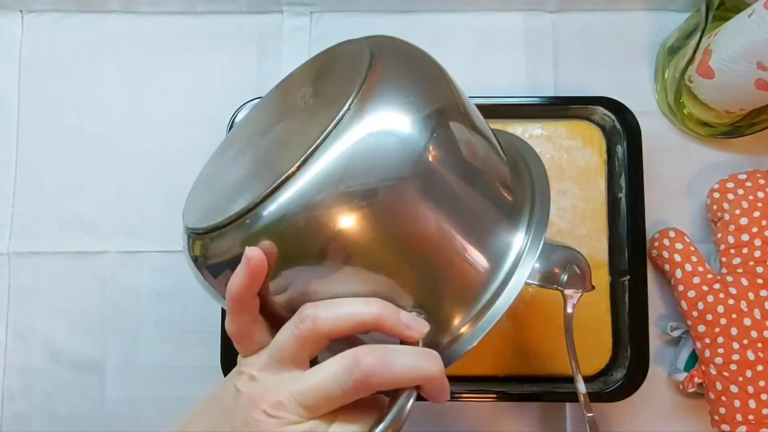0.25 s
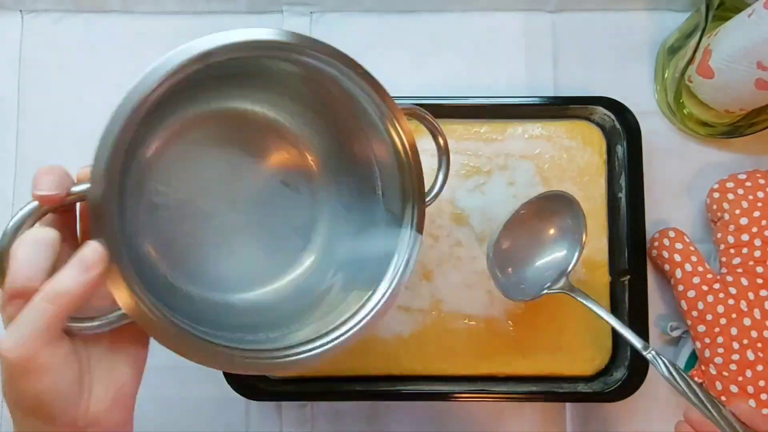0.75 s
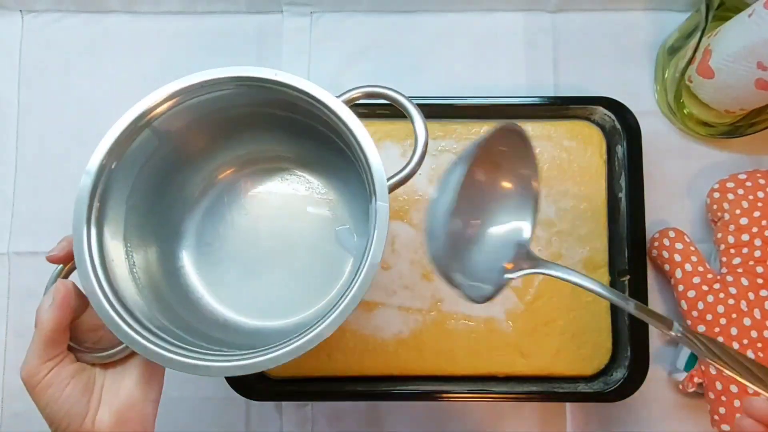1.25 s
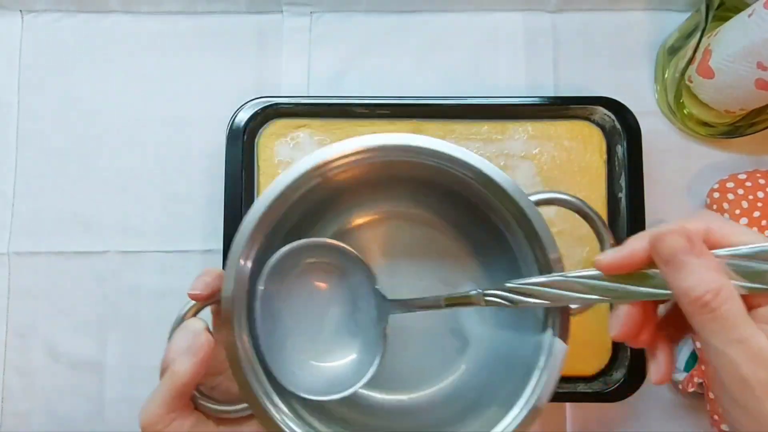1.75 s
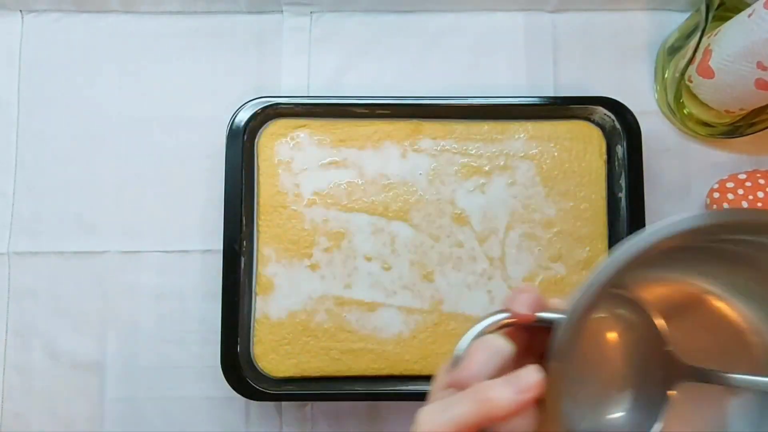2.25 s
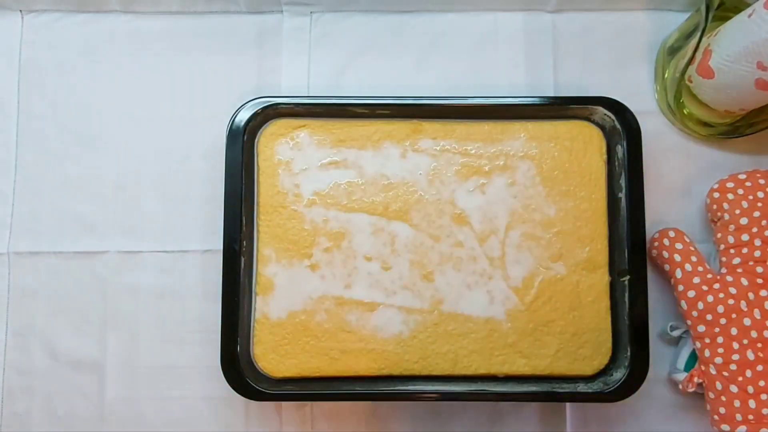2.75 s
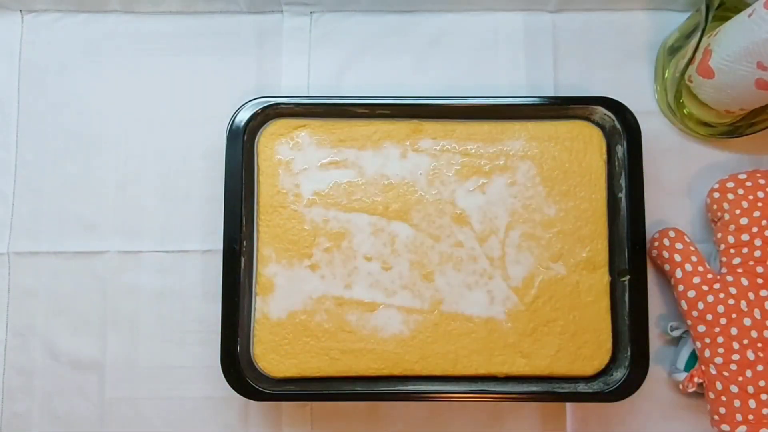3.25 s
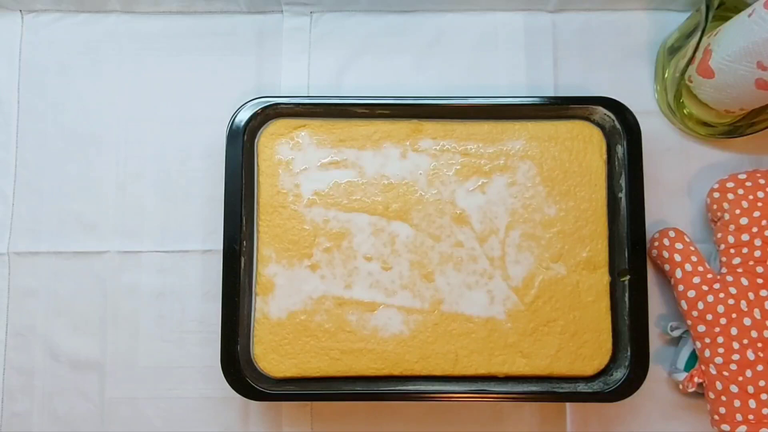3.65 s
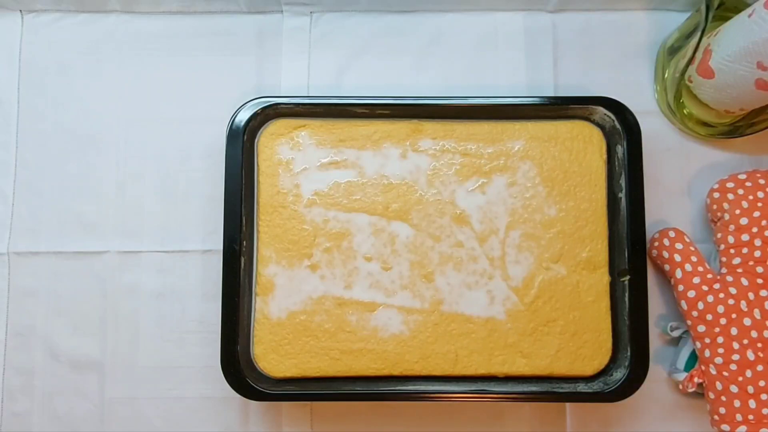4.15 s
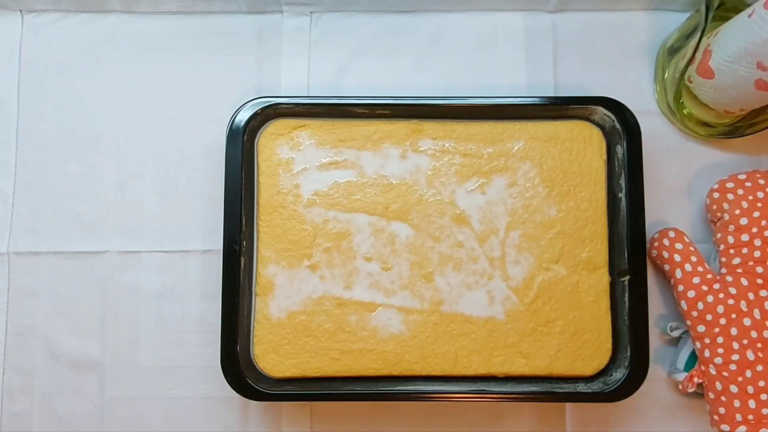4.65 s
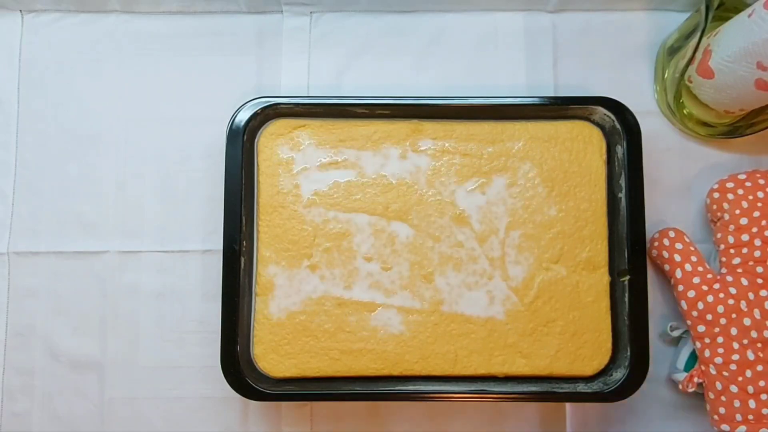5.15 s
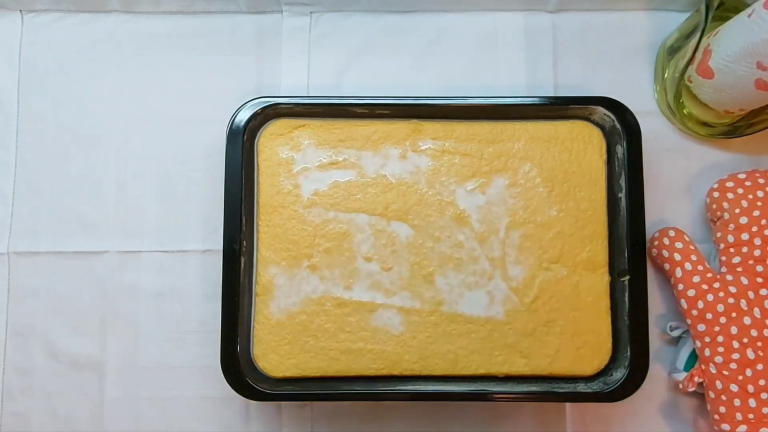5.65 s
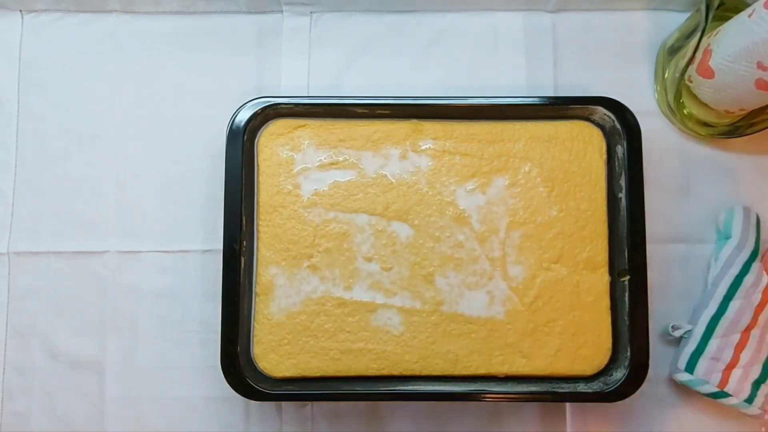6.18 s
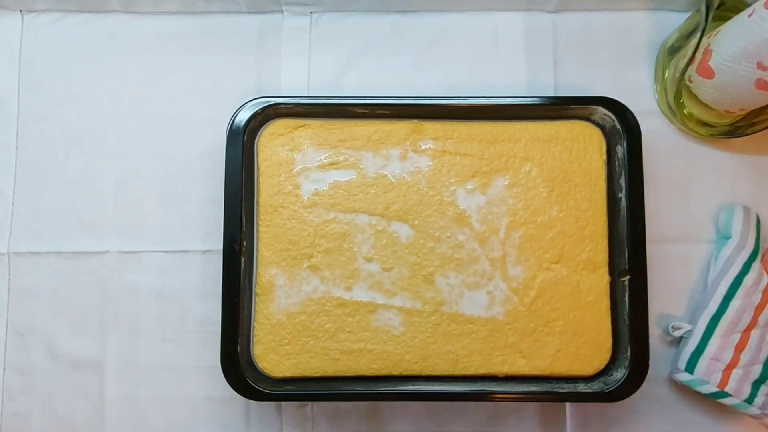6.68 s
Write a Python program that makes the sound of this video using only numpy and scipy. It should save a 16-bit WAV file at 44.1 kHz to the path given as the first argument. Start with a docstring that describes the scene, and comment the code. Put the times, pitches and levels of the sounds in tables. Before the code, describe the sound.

Faint handling bumps lead into a bright clank of a ladle landing in a steel pot. The pot clatters down on a counter and scrapes lightly. After a brief pause comes a heavy wooden thud with a crack to it, then deep footfalls, light taps and the soft rub of oven mitts. A stereo microphone picks it up in a small kitchen with a slight hum.

```python
"""Ladle and pot in a small kitchen

A steel ladle drops into a steel pot and rattles; the pot is set down and slid on a counter.
Later something heavy thuds on wood and cloth rustles. Steel and wood ring as decaying modes,
sliding and rubbing are grainy noise, and steps rumble. Two spaced microphone ports hear it all
over quiet air and a faint hum."""
import sys
import numpy as np
from scipy import signal
from scipy.fft import rfft, irfft
from scipy.io import wavfile
from scipy.ndimage import uniform_filter1d

SR = 44100
rng = np.random.default_rng(int(sys.argv[2]) if len(sys.argv) > 2 else 0)


def inscribe(sig):
    """Save sig as 16-bit PCM at rate SR to the path in sys.argv[1].

    A 1-D sig is mono; a 2-D sig holds one channel per row.
    Samples are clipped to [-1, 1] before scaling.
    """
    pcm = np.round(np.clip(np.atleast_2d(sig).T, -1, 1) * 32767)
    wavfile.write(sys.argv[1], SR, pcm.astype(np.int16))


N = 305172
BLOW_T = np.arange(SR // 2) / SR  # seconds since a blow
STEEL_LAG_MS, STEEL_PAN_DB = 0.41, -2.7  # the steel lies nearer the right port


def gain_of(db):
    return 10 ** (np.asarray(db) / 20)


def unit_rms(x):
    return x / np.sqrt(np.mean(x ** 2) + 1e-30)


def curve_at(points, hz):
    f, value = np.transpose(points)
    return np.interp(np.log(hz + 1), np.log(f + 1), value)


def add(mix, start_s, sound):
    part = mix[..., round(start_s * SR):][..., :sound.shape[-1]]
    part += sound[..., :part.shape[-1]]


def coloured(x, spectrum):
    """Filter x by a spectrum, at unit power."""
    size = x.shape[-1]
    gain = gain_of(curve_at(spectrum, np.fft.rfftfreq(size, 1 / SR)))
    return unit_rms(irfft(rfft(x) * gain, size))


def tilted(spectrum, tilt_db, pivot_hz):
    return [(hz, db + tilt_db * np.log2(hz / pivot_hz)) for hz, db in spectrum]


def wander(size, span):
    return unit_rms(uniform_filter1d(rng.standard_normal(size), span))


def attack(rise_s):
    return np.minimum(BLOW_T / rise_s, 1)


def swell(t, peak_s, db, rise_s, fall_s):
    """Gain that climbs 20 dB per rise_s to its peak, then drops 20 dB per fall_s."""
    return gain_of(db - 20 * np.maximum((peak_s - t) / rise_s, (t - peak_s) / fall_s))


def ports(x, pan_db, lag_ms):
    """The left port hears x later than the right; pan_db is left minus right."""
    left, right = x * np.ones((2, 1))
    hz = np.fft.rfftfreq(len(left), 1 / SR)
    left = irfft(rfft(left) * np.exp(-2j * np.pi * hz * lag_ms / 1000), len(left))
    return np.array([left * gain_of(pan_db / 2), right * gain_of(-pan_db / 2)])


def ring(modes, tilt_db, pivot_hz, t60_scale, loose, port_turns, scatter_turns=1):
    """Decaying modes that waver with loose contact; each port hears its own phase."""
    hz, db, t60 = np.transpose(modes)[:, :, None]
    phase = scatter_turns * rng.random(hz.shape)
    left_shift = np.exp(2j * np.pi * port_turns * rng.standard_normal(hz.shape))
    real, imag = rng.standard_normal((2, len(hz), 41))
    waver = signal.resample(1 + loose * (real + 1j * imag), len(BLOW_T), axis=1)
    waver /= np.sqrt(1 + 2 * loose ** 2)
    level_db = db + tilt_db * np.log2(hz / pivot_hz) - 60 * BLOW_T / (t60 * t60_scale)
    sines = gain_of(level_db) * waver * np.exp(2j * np.pi * (hz * BLOW_T + phase))
    sound = np.array([(sines * left_shift).sum(0).imag, sines.sum(0).imag])
    fade = signal.windows.tukey(2 * len(BLOW_T), 0.2)[len(BLOW_T):]
    return sound * fade * attack(0.00091)


# Room air. Each row: frequency in Hz, relative density in dB.
AIR_SPECTRUM = [(15, -67.5), (25, -37.5), (69, -32), (79, -14.5), (96, -8), (158, -9), (205, -23), (253, 1),
                (350, -12), (380, -3.5), (412, -14.5), (1200, -35.5), (1560, -74), (2640, -120)]
# Likeness of the air at the two ports. Each row: frequency in Hz, correlation.
AIR_COHERENCE = [(60, 0.46), (300, 0.29), (950, .15)]


def air():
    """Low room noise whose spectrum drifts in patches."""
    frames, hz = N // 512 + 5, np.fft.rfftfreq(2048, 1 / SR)
    a, b, c, d, patches = rng.standard_normal((frames, 1025, 5)).T
    patches = unit_rms(uniform_filter1d(uniform_filter1d(patches, 16, 0), 8, 1))
    coherence = curve_at(AIR_COHERENCE, hz)[:, None]
    right = a + 1j * b
    left = coherence * right + np.sqrt(1 - coherence ** 2) * (c + 1j * d)
    bins = np.array([left, right]) * gain_of(curve_at(AIR_SPECTRUM, hz)[:, None] + 0.49 * patches)
    return unit_rms(signal.istft(bins, nperseg=2048, noverlap=1536)[1][:, :N])


def hum(hz=378.6, drift_hz=3.1, waver_db=1.2):
    """One tone, wavering in pitch and level."""
    phase = 2 * np.pi * np.cumsum(hz + drift_hz * wander(N, 4000)) / SR
    return ports(gain_of(waver_db * wander(N, 4000)) * np.sin(phase), 0, lag_ms=0.42)


# Microphone hiss. Each row: frequency in Hz, relative density in dB.
HISS_SPECTRUM = [(710, -31), (1200, -0.5), (1940, -5.5), (7090, -12), (11200, 0.5), (14100, -5),
                 (15500, -5)]
# Level of air and hum. Each row: time in seconds, gain in dB.
LULL = [(3.199, 5), (3.399, -0.5), (4.3, 2), (4.8, 10)]


def background():
    """Steady microphone hiss, with air and hum that dip for a while and return louder."""
    hiss = gain_of(-79) * coloured(rng.standard_normal((2, N)), HISS_SPECTRUM)
    lull = gain_of(np.interp(np.arange(N) / SR, *np.transpose(LULL)))
    return hiss + lull * (gain_of(-74) * air() + gain_of(-77.5) * hum())


# Steps and body movement. Each row: peak in seconds, level in dB, rise and fall in seconds.
RUMBLE_SWELLS = [(.43, -61, 0.38, 0.24), (1.68, -69.5, 0.51, 0.24), (2.14, -61, 0.28, 0.1),
                 (3.1, -60, 0.68, 0.36), (3.8, -68, 0.48, 0.24), (4.58, -46.5, 0.11, 0.15),
                 (4.77, -38, .06, 0.14), (5.1, -57.5, 0.44, 0.26)]
# Floor and counter. Each row: frequency in Hz, relative density in dB.
RUMBLE_SPECTRUM = [(15, -53.5), (25, -18.5), (75, -10.5), (105, -6), (151, 3), (216, -12), (387, -16.5),
                   (425, -30), (600, -40.5), (780, -67), (1320, -120)]


def rumble(steady_db=-77):
    """Low noise carried by floor and counter, nearly alike at both ports."""
    t = np.arange(N) / SR
    common, left, right = rng.standard_normal((3, N))
    noise = coloured(np.array([common + 0.29 * left, common + 0.12 * right]), RUMBLE_SPECTRUM)
    power = gain_of(steady_db) ** 2 + sum(swell(t, *row) ** 2 for row in RUMBLE_SWELLS)
    return noise * np.sqrt(power)


# Faint steel pings. Each row: start in seconds, frequency in Hz, level in dB.
PINGS = [(.11, 1383, -70.5), (1.04, 4540, -75), (1.075, 4560, -73), (1.11, 4520, -76), (1.44, 1385, -69),
         (1.582, 1415, -70), (3.391, 1390, -68), (3.99, 4480, -73.5), (4.001, 1740, -61),
         (5.664, 3310, -67), (5.668, 5260, -71), (6.581, 1860, -68)]


def pings(rise_s=0.013, t60_s=0.19):
    """Single wavering modes of the steel with a soft onset."""
    out = np.zeros((2, N))
    for start_s, hz, db in PINGS:
        ping = ring([(hz, db, t60_s)], 0, hz, 1, loose=1.5, port_turns=0.03)
        add(out, start_s, ports(ping * attack(rise_s), STEEL_PAN_DB, STEEL_LAG_MS))
    return out


# Wood modes. Each row: frequency in Hz, level in dB, T60 in seconds.
WOOD_MODES = [(60.6, -24, 0.39), (105, 1.5, 0.7), (156.5, -5.5, 0.74), (179.26, -4.5, 0.37),
              (268, -9, 0.48), (293.9, -2.5, 0.21), (320, -10, 0.22), (382, -22.5, 0.48)]
# Contact noise. Each row: frequency in Hz, relative density in dB.
KNOCK_SPECTRUM = [(180, -29), (300, -5.5), (484, -9.5), (1180, -16.5), (1300, -18.5), (2070, -17.5),
                  (2880, -25), (3690, -19), (4210, -28), (5050, -23.5), (5850, -36), (6680, -33),
                  (10800, -33), (15500, -46)]
# Dull blows. Each row: start in seconds, wood level in dB, wood tilt in dB/octave,
# knock level in dB, knock cutoff in Hz, T60 scale.
THUDS = [(.36, -53.5, -6, -66, 655, 1.13), (.431, -60.5, 15.5, -87, 700, 1.06),
         (.58, -72, -10, -74.5, 2600, 0.6), (1.993, -36.5, 10, -70, 710, 0.33),
         (2.239, -69, -5, -52, 1202, 0.34), (2.461, -68, 4.5, -60, 975, 0.61),
         (2.804, -48, 7, -42, 950, 0.37), (4.3598, -25, 4.5, -27, 15130, 1.017),
         (4.378, -40.5, 2, -35.5, 14960, 0.92), (4.755, -41.5, -3.5, -60, 898, 0.71),
         (4.93, -58, -9, -64.5, 894, 1.3), (5.312, -82.5, 8.5, -58, 1136, 0.53),
         (5.334, -60, 10, -52.5, 2380, 0.6), (5.449, -70, -0.5, -64.5, 1084, 1.57),
         (5.6, -56.5, 9, -63, 901, 0.74), (5.635, -56.5, 0, -60.5, 887, 0.46),
         (6.266, -57, 12, -48.5, 2414, 0.62), (6.286, -57, 16, -52.5, 2590, 0.52),
         (6.327, -64.5, 13, -65, 902, 0.35), (6.716, -54, 10, -67.5, 1900, 0.73)]


def thuds():
    """A blow rings the wood and adds a noisy knock; softer contact is duller and slower."""
    out = np.zeros((2, N))
    for start_s, wood_db, tilt_db, knock_db, cutoff_hz, t60_scale in THUDS:
        wood = ring(WOOD_MODES, tilt_db, 180, t60_scale, loose=0.37, port_turns=0.017,
                    scatter_turns=0.12)
        wood *= gain_of(wood_db) * attack(0.00058 + 12 / cutoff_hz)
        knock = coloured(rng.standard_normal(len(BLOW_T)), KNOCK_SPECTRUM)
        knock = unit_rms(signal.sosfilt(signal.butter(6, cutoff_hz, fs=SR, output="sos"), knock))
        knock *= gain_of(knock_db - 60 * BLOW_T / (0.31 * t60_scale)) * attack(16 / cutoff_hz)
        add(out, start_s, ports(wood + knock, -1.1, lag_ms=0.056))
    return out


# Steel modes, rubbed here and struck in clanks(). Each row: frequency in Hz, level in dB, T60 in seconds.
LADLE_MODES = [(947, -24, 1.0), (1147, -7, .29), (1738, -4, 0.31), (1996, -12, .7), (2217, -13, 0.24),
               (2806, -11, 0.36), (3381, -14, .22), (3591, -12, 0.5), (4305, -8, .24), (4367, -5, .16),
               (4403, -11, .22), (4495, -14, 0.3), (4562, -11, .22), (4592, -8, .2), (4887, -18, .36),
               (5858, -9, .24), (6120, -12, .18), (1323, -7, 0.13), (1645, -8, 0.1), (4160, -12, .12),
               (5663, -5, .08), (6400, -7, .12), (6815, -8, .11), (8138, -10, 0.1), (8560, -7.5, .12),
               (9345, -3.5, .09), (9579, 3, 0.063), (10200, -4.5, .07), (11330, -1, .07), (11700, -1, 0.06),
               (12500, -5.5, .06), (13945, -2, .05)]
HANDLE_MODES = [(436, -3, 0.23), (1110, -1, 0.17), (2299, -3.5, 0.19), (2850, -8.5, 0.083),
                (3950, -6, 0.24), (6140, -3.5, 0.18), (6990, -3, .12), (8740, -2, .12), (9450, -2, 0.099),
                (10470, -2, 0.18), (11360, -3.5, .1)]
# Friction bands. Each row: frequency in Hz, relative density in dB.
FRICTION_HIGH = [(1470, -26), (2500, -14), (4680, -2.5), (5080, -4), (5620, -4.5), (9370, -4), (12000, 2),
                 (15500, -8)]
FRICTION_LOW = [(150, -29.5), (250, -2.5), (457, -5.5), (718, -7), (1130, -15.5), (2090, -9.5), (4000, -46),
                (5200, -69.5), (8800, -120)]


def friction(peak_s, db, rise_s, fall_s, tilt_db, ring_db, low_db):
    """One stroke of grainy noise in two bands, part of which excites the steel."""
    out = np.zeros((2, N))
    start_s = max(peak_s - 0.5, 0)
    t = start_s + np.arange(SR) / SR
    grain = gain_of(3.5 * wander(SR, 250) + 3.6 * wander(SR, 1500))
    high, low = unit_rms(rng.standard_normal((2, SR)) * grain)
    steel = ring(LADLE_MODES + HANDLE_MODES, 1.5, 3000, 0.25, loose=0.26, port_turns=0)[1]
    sound = coloured(high, tilted(FRICTION_HIGH, tilt_db, 8000))
    sound += gain_of(ring_db) * unit_rms(signal.fftconvolve(high, steel)[:SR])
    sound += gain_of(low_db - 2 * tilt_db) * coloured(low, FRICTION_LOW)
    envelope = swell(t, peak_s, db, rise_s, fall_s) * signal.windows.tukey(SR, 0.1)
    add(out, start_s, ports(sound * envelope, -0.63, lag_ms=0.28))
    return out


# Sliding metal. Each row: peak in seconds, level in dB, rise and fall in seconds,
# tilt in dB/octave, relative ring level in dB.
SLIDES = [(1.06, -77.5, 0.097, 0.17, 7, -8.5), (3.09, -64, 0.31, 0.088, -1.5, -10),
          (3.21, -54, 0.26, 0.079, -2, -13.5), (3.86, -80.5, 0.071, 0.055, 8, -0.5),
          (4.01, -68, 0.041, 0.069, -4, -2.5)]


def slides():
    """Steel scrapes and rings as it slides."""
    return sum(friction(*row, low_db=-4) for row in SLIDES)


# Hard contact. Each row: frequency in Hz, relative density in dB.
CRACK_SPECTRUM = [(150, -49.5), (250, -12.5), (430, -5), (656, -11.5), (1320, -5.5), (1470, -10),
                  (1720, -6), (2530, -14), (2760, -9), (3780, -10.5), (4430, -11), (5280, -8.5),
                  (9580, -7.5), (14300, -9.5), (16500, -34)]


def crack(db, tilt_db, rise_s, tail_scale):
    """A noise burst standing for high modes too dense to tell apart."""
    common, left = rng.standard_normal((2, len(BLOW_T)))
    noise = np.array([0.75 * common + 0.66 * left, common])
    noise = coloured(noise, tilted(CRACK_SPECTRUM, tilt_db, 3000))
    decay = gain_of(-60 * BLOW_T / 0.073) + 0.2 * gain_of(-60 * BLOW_T / (0.097 * tail_scale))
    return gain_of(db) * noise * decay * attack(rise_s)


# Pot modes. Each row: frequency in Hz, level in dB, T60 in seconds.
POT_MODES = [(442, -12, 0.24), (566, -12, .13), (940, -16, 0.45), (966, -14, .25), (1383, -14, .28),
             (1957, -9, .22), (2008, -1, 0.27), (3182, 2, 0.14), (3198, -17, .4), (4535, -16, .2),
             (4653, -9, 0.16), (343, -16, .12), (510, -18, .12), (2115, -9.5, 0.1), (5615, -17, .17),
             (6307, -10.5, .12), (10100, -17, .1), (12471, -14, .08)]
# Times in seconds when a hand or the counter stills the steel.
GRIPS_S = np.array([2.215, 2.76, 2.985])
# Metal blows. Each row: start in seconds, pan in dB, ladle, handle, pot and crack levels in dB,
# tilt in dB/octave, T60 scale, looseness.
CLANKS = [(1.9933, -7, -20, -47.5, -35, -18, 1, 0.64, 0.34),
          (2.0192, 2, -27.5, -39, -32, -26.5, 0, 0.98, 0), (2.634, -3, -38, -33, -60, -24, 3, 0.95, 1.3),
          (2.8053, -6, -36, -40.5, -14, -17, -2, 0.36, 0),
          (2.8189, 2.5, -35, -33, -16, -25.5, 2.5, 0.71, 0.5),
          (2.830, -7, -33, -31.5, -26.5, -14.5, -1, 0.5, 0.5),
          (2.8945, 4.5, -67, -70, -35, -60, -0.5, 0.87, 0.16)]


def clanks(rebound_db=-4, hollow_hz=1080, grip_db_per_s=480):
    """Each blow rings ladle, handle and pot by its own shares, over a crack."""
    out = np.zeros((2, N))
    for start_s, pan_db, ladle_db, handle_db, pot_db, crack_db, tilt_db, t60_scale, loose in CLANKS:
        parts = (LADLE_MODES, ladle_db), (HANDLE_MODES, handle_db), (POT_MODES, pot_db)
        steel = sum(gain_of(db) * ring(modes, tilt_db, 3000, t60_scale, loose, port_turns=0.03)
                    for modes, db in parts)
        # Every later blow damps this ring.
        later_s = np.array([row[0] - start_s for row in CLANKS if row[0] > start_s])[:, None]
        steel *= gain_of(rebound_db * np.clip((BLOW_T - later_s) / 0.003, 0, 1).sum(0))
        # Only the hollow low modes ring on through a grip.
        gripped_s = np.maximum(BLOW_T + start_s - GRIPS_S[GRIPS_S > start_s][0], 0)
        hollow = signal.sosfilt(signal.butter(4, hollow_hz, fs=SR, output="sos"), steel)
        steel = hollow + (steel - hollow) * gain_of(-grip_db_per_s * gripped_s)
        sound = steel + crack(crack_db, tilt_db, 0.0004, t60_scale)
        add(out, start_s, ports(sound, pan_db, STEEL_LAG_MS))
    return out


# Counter shudders. Each row: peak in seconds, level in dB, rise and fall in seconds.
SHUDDERS = [(1.997, -50, .006, .05), (4.6, -61, 0.17, 0.14), (4.8, -59, 0.13, 0.43)]
# Counter resonance. Each row: frequency in Hz, relative density in dB.
SHUDDER_SPECTRUM = [(25, -29.5), (45, -8), (57, 2.5), (75, -9), (130, -49)]


def shudders():
    """The counter shakes in swells of deep noise, the same at both ports."""
    envelope = sum(swell(np.arange(N) / SR, *row) for row in SHUDDERS)
    return coloured(rng.standard_normal(N), SHUDDER_SPECTRUM) * envelope


# Short bright clicks. Each row: start in seconds, level in dB, tilt in dB/octave, rise in seconds.
CLICKS = [(2.213, -48.5, -0.5, 0.0062), (2.267, -59, -1.5, 0.006), (2.351, -63.5, 7.5, 0.0031),
          (2.471, -53, 17, 0.013), (2.775, -42.5, 0, .019), (4.362, -27, 5.5, 0.0028),
          (5.344, -53, 10.5, 0.004), (5.371, -60, 7.5, 0.0024), (5.658, -48.5, 7, 0.012),
          (6.7151, -64, 4, 0.00045)]


def clicks():
    """Short bright clicks: light touches and the sharp crack of the heavy thud."""
    out = np.zeros((2, N))
    for start_s, db, tilt_db, rise_s in CLICKS:
        add(out, start_s, ports(crack(db, tilt_db, rise_s, 0.7), STEEL_PAN_DB, STEEL_LAG_MS))
    return out


# Cloth and hands. Each row: peak in seconds, level in dB, rise and fall in seconds, tilt in dB/octave.
RUSTLES = [(2.216, -64.5, 0.019, 0.16, -6), (2.58, -74, 0.46, 0.1, -2.5), (3.5, -81.5, 0.3, 0.17, 2.5),
           (4.764, -76, 0.12, 0.27, 5.5), (5.25, -72, 0.26, 0.33, -1.5), (5.36, -65.5, .04, 0.069, 1),
           (5.6, -71, .4, 0.089, 14), (5.67, -66, 0.066, 0.094, 2), (5.92, -77, 0.17, .15, 5),
           (6.01, -70, 0.085, 0.022, 3.5), (6.145, -63.5, 0.046, 0.04, 8), (6.239, -71, 0.084, 0.094, 4),
           (6.29, -71, 0.09, 0.053, -6), (6.52, -76, 0.063, 0.078, 7), (6.595, -64, 0.16, 0.049, 2),
           (6.9, -72.5, 0.47, .2, -1.5)]


def rustles():
    """Cloth and hands rub, barely ringing the steel."""
    return sum(friction(*row, ring_db=-37.5, low_db=-7.5) for row in RUSTLES)


# Kitchen decay. Each row: frequency in Hz, T60 in seconds.
ROOM_T60 = [(100, 0.77), (500, 0.37), (2000, 0.32), (5000, 0.29), (14000, 0.32)]


def room(x):
    """Sparse reflections of random sign for each port, each band dying at its own rate."""
    taps = np.zeros((2, SR))
    slots = np.arange(160, SR - 20, 20)
    arrivals = slots + rng.integers(0, 20, (2, len(slots)))
    np.put_along_axis(taps, arrivals, rng.choice([-1., 1.], arrivals.shape), 1)
    hz, t, bins = signal.stft(taps, SR, nperseg=256)
    decay = gain_of(-60 * t / curve_at(ROOM_T60, hz)[:, None])
    tail = signal.istft(bins * decay, SR, nperseg=256)[1]
    tail = signal.lfilter(*signal.butter(2, 330, "high", fs=SR), tail)  # a small room adds little bass
    return signal.fftconvolve(x, tail / np.linalg.norm(tail[0]), axes=1)[:, :N]


def scene():
    """Blows and friction feed the room; low noise and background stay dry."""
    bright = clanks() + clicks() + pings()
    wood = thuds()
    rubbing = rustles() + slides()
    send = gain_of(-8.5) * bright + gain_of(-2) * wood + gain_of(1.5) * rubbing
    return bright + wood + rubbing + room(send) + rumble() + shudders() + background()


def record(dry):
    """Low-pass that rolls off the highs above 16 kHz."""
    lowpass = signal.firwin(511, 16000, window=("kaiser", 9), fs=SR)
    return signal.oaconvolve(dry, lowpass[None], "same")


dry = scene()
out = record(dry)
inscribe(out)
```